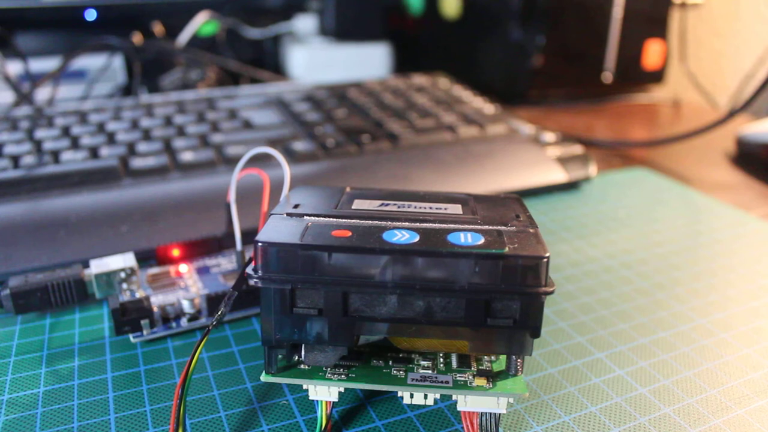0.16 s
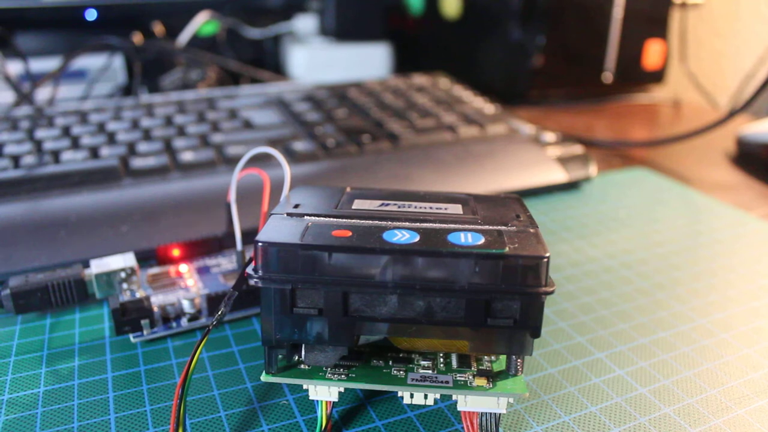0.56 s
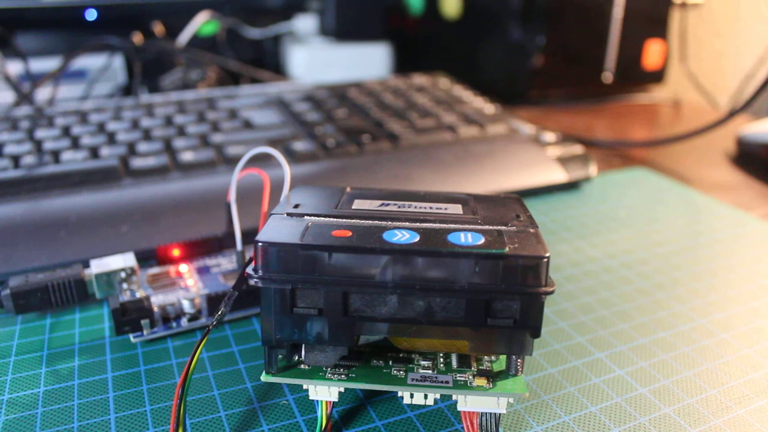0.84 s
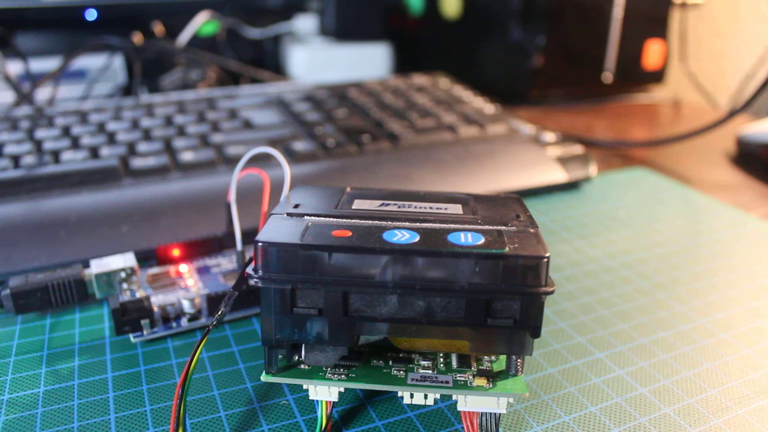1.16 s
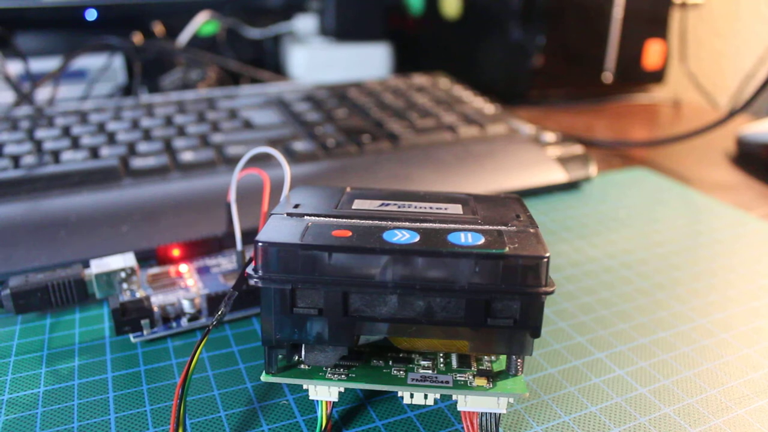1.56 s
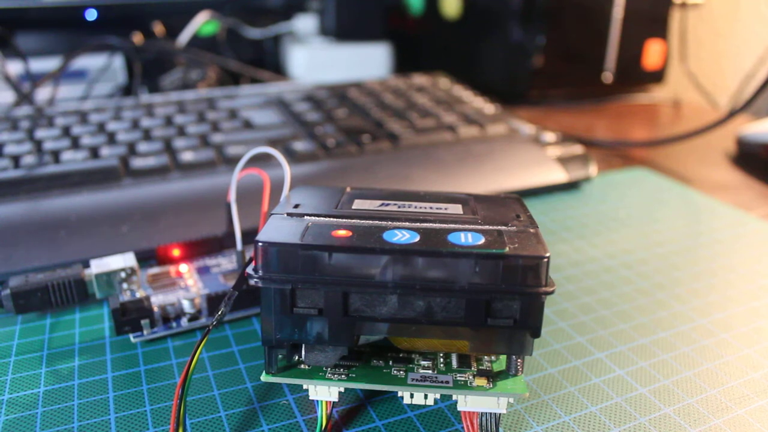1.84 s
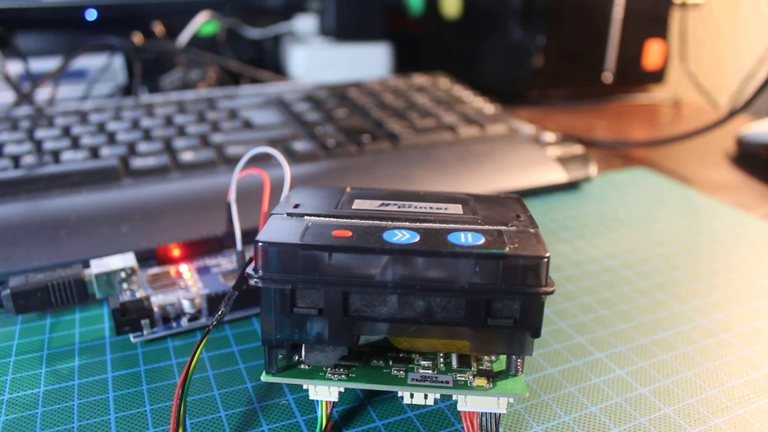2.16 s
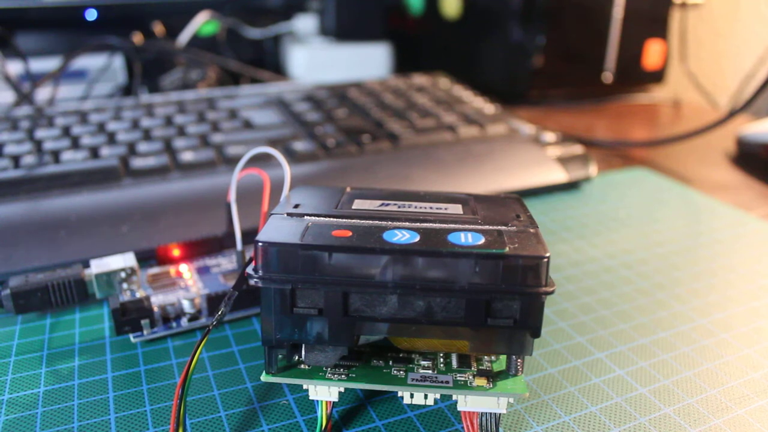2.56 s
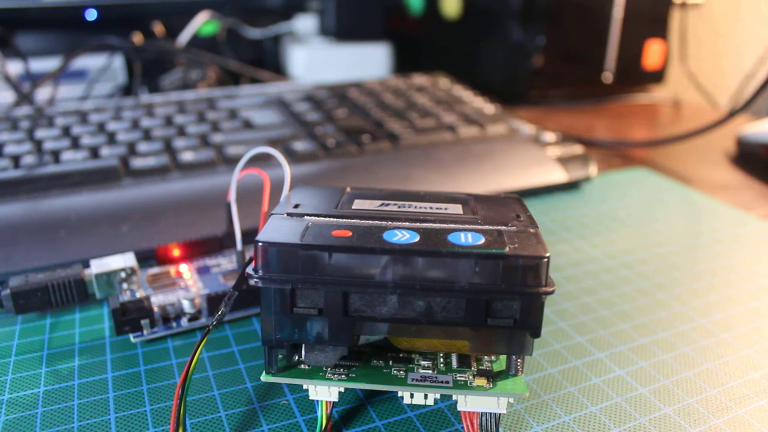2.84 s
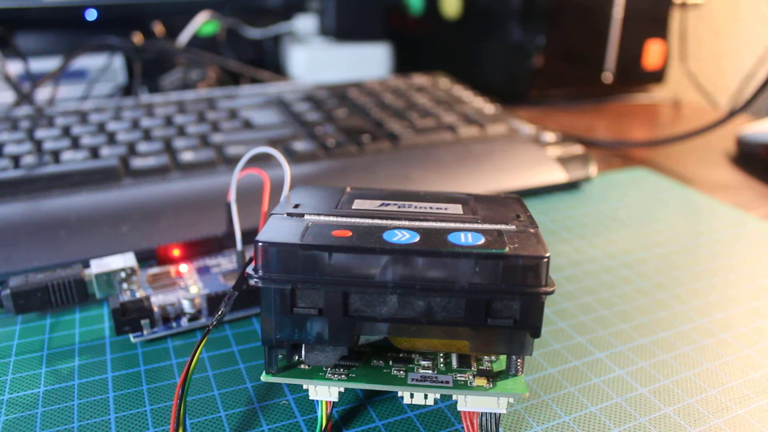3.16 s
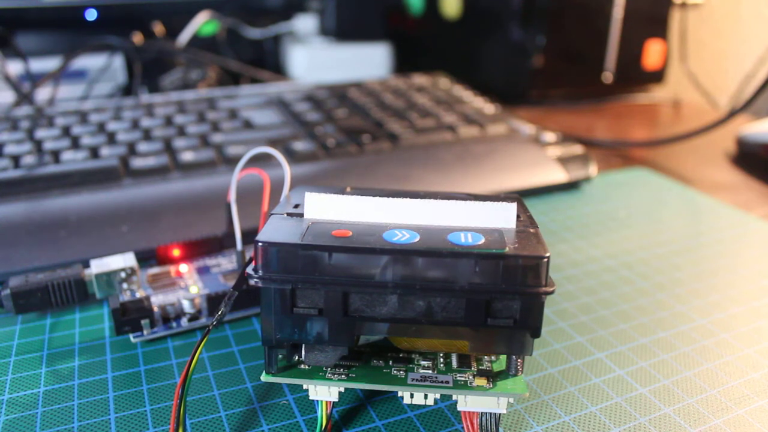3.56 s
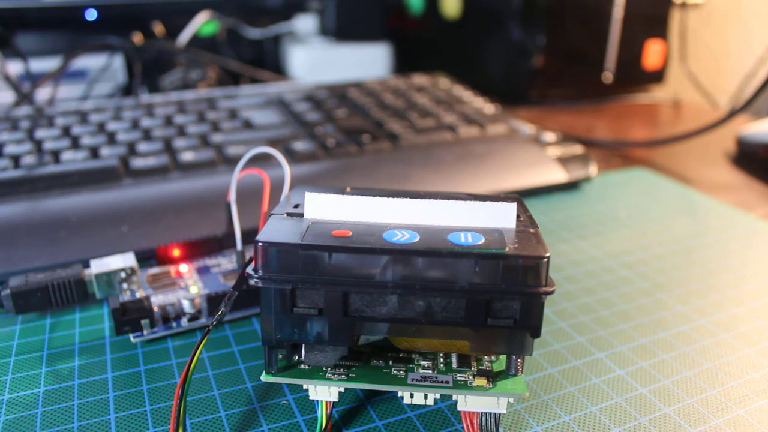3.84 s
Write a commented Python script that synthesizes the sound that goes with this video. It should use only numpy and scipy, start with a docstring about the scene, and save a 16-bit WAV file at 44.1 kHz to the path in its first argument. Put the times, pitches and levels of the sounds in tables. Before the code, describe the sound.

A small thermal printer buzzes briefly as it feeds paper, over soft computer fan noise.

```python
"""Thermal printer on a desk

Close on a small printer in a quiet room: computer fans, mains hum, a thin electronic whine and two
faint swishes. Late on it feeds a strip of paper. The gears clack as they take up slack, the stepper
motor whirs lightly, then labours in three buzzing surges, each step shaking case, gears and desk."""
import sys
import numpy as np
from scipy import signal
from scipy.io import wavfile
from scipy.ndimage import uniform_filter1d

SR = 44100
rng = np.random.default_rng(int(sys.argv[2]) if len(sys.argv) > 2 else 0)


def unload_wav(signal):
    """Save mono or channel-first audio to the path in sys.argv[1] as 16-bit WAV at rate SR, clipped to [-1, 1]."""
    wavfile.write(
        sys.argv[1],
        SR,
        np.round(np.clip(np.atleast_2d(signal).T, -1, 1) * 32767).astype(np.int16),
    )


N = 176400
T = np.arange(N) / SR


def amp(db):
    """Decibels to amplitude."""
    return 10 ** (np.asarray(db) / 20)


def unit_rms(x):
    """Scale to an RMS of 1."""
    return x / np.sqrt(np.mean(x ** 2) + 1e-20)


def curve_at(points, hz):
    """Read (frequency, value) points along a log frequency axis."""
    f, value = np.transpose(points)
    return np.interp(np.log(hz + 1), np.log(f + 1), value)


def resonate(x, hz, width_hz):
    """Two resonators in series, each width_hz wide, with gain 1 at a pitch that may move."""
    turn = np.exp(2j * np.pi * np.cumsum(hz * np.ones(len(x))) / SR)
    pole = np.exp(-np.pi * width_hz / SR)
    for _ in range(2):
        x = 2 * (turn * signal.lfilter([1 - pole], [1, -pole], x / turn + 1e-18)).real
    return x


def body(x, modes):
    """Ring modes (f/Hz, width/Hz, gain/dB) with alternating sign."""
    widen = 1.53  # offsets the narrowing of two resonators in series
    return sum((-1) ** k * amp(db) * resonate(x, f, w * widen) for k, (f, w, db) in enumerate(modes))


def noise_band(hz, width_hz, db):
    """A fuzzy tone: steady noise through one resonance."""
    return amp(db) * unit_rms(body(rng.standard_normal(N), [(hz, width_hz, 0)]))


def soften(x, cutoff_hz=10400):
    """Plastic teeth give little top treble."""
    return signal.lfilter(*signal.butter(3, cutoff_hz, fs=SR), x)


def fans(wash_db=-51.5):
    """Computer fans fill the room with broad noise, faintly drifting in patches, and fuzzy drones."""
    # fan noise spectrum: f/Hz, relative density/dB
    spectrum = [(12, -49), (20, -24), (47, -13), (70, -14), (87, -13.5), (106, -15.5), (122, -5), (161, -8),
                (245, -6.5), (383, -11.5), (506, -13), (1460, -18.5), (3360, -24), (9950, -33.5),
                (10800, -38), (11800, -37), (15500, -50)]
    # fan drones: f/Hz, width/Hz, level/dB
    drones = [(51.4, 8, -71.5), (192.7, 15, -61), (242, 31.7, -54), (294, 29, -63.5), (496.4, 57, -65),
              (3314, 70, -73)]
    frames, hz = N // 512 + 5, np.fft.rfftfreq(2048, 1 / SR)
    real, imag, patches = rng.standard_normal((frames, len(hz), 3)).T
    patches = uniform_filter1d(patches, size=20, axis=0)
    drift_db = 0.57 * unit_rms(uniform_filter1d(patches, size=8, axis=1))
    bins = (real + 1j * imag) * amp(curve_at(spectrum, hz)[:, None] + drift_db)
    wash = signal.istft(bins, nperseg=2048, noverlap=1536)[1][:N]
    return amp(wash_db) * unit_rms(wash) + sum(noise_band(*drone) for drone in drones)


def electronics(whine_hz=11719.5, waver_db=1.25):
    """Mains hum and thin high tones waver in level beside a whine whose throb slows a little."""
    # mains hum, then the high tones: f/Hz
    tones_hz = [100, 9922, 11592, 11647, 11680, 11900, 12882]
    # the same tones: level/dB
    tones_db = [-59.5, -87, -88, -86, -84, -89, -84]
    # throb rate of the whine: t/s, f/Hz
    throb_rate = [(0, 28.46), (.9, 28.3), (2.0, 27.06), (2.9, 25.8), (4, 26.3)]
    # lines of the whine: offset/multiples of the throb rate, level/dB
    sidebands = [(-11, -85), (-7, -86), (-4, -89), (-2, -79), (0, -84), (2, -82.5), (4, -84), (6, -82),
                 (8, -88), (11, -91)]
    tones = sum(amp(db) * np.sin(2 * np.pi * (f * T + rng.random()))
                for f, db in zip(tones_hz, tones_db))
    throb = np.cumsum(np.interp(T, *np.transpose(throb_rate))) / SR
    whine = sum(amp(db) * np.sin(2 * np.pi * (whine_hz * T + k * throb)) for k, db in sidebands)
    pulsing_noise = rng.standard_normal(N) * (1 + .6 * np.cos(4 * np.pi * throb))
    fuzz = amp(-81.5) * unit_rms(body(pulsing_noise, [(11720, 280, 0)]))
    drift = uniform_filter1d(uniform_filter1d(rng.standard_normal(N), size=4000), size=4000)
    waver = amp(waver_db * unit_rms(drift))
    return np.sqrt(2) * (tones * waver + whine) + fuzz + noise_band(9932, width_hz=35, db=-79.5)


def swishes():
    """Two faint brushes of noise swell and fade, the first falling in colour."""
    # brushes: centre t/s, half length/s, level/dB, from f/Hz, to f/Hz, resonator width/Hz
    brushes = [(0.231, .018, -54, 4200, 3230, 1610), (3.08, .05, -72, 10400, 10400, 1500)]
    out = np.zeros(N)
    for centre, half_length, db, from_hz, to_hz, width_hz in brushes:
        progress = (T - centre) / half_length
        hz = to_hz + (from_hz - to_hz) * (1 - np.tanh(progress)) / 2
        noise = unit_rms(resonate(rng.standard_normal(N), hz, width_hz))
        out += amp(db) * noise * np.exp(-progress ** 2 / 2)
    return out


def gear_clacks():
    """Teeth take up slack, and each short bright burst rings in the gear train."""
    # tooth impacts: t/s, peak level/dB, decay/s, sheen gain/dB
    impacts = [(3.2094, -15.5, 0.0011, 6), (3.2115, -16, 0.0018, 5), (3.279, -33, .002, -4),
               (3.284, -31, 0.0016, 0), (3.301, -28, .002, -6), (3.304, -17, 0.0015, -4),
               (3.4173, -29, .002, -8), (3.424, -18, .002, -9), (3.448, -17, 0.0013, -8)]
    # ring of the gear train: f/Hz, width/Hz, gain/dB
    ring = [(1100, 300, -7), (1910, 500, -10), (4100, 1100, -11), (5070, 800, 0), (6700, 1160, -3),
            (7500, 1000, -2.5), (9080, 870, -3)]
    # top treble sheen: f/Hz, width/Hz, gain/dB
    sheen = [(11500, 1200, -22.5), (13600, 1200, -28)]
    out, t = np.zeros(N), np.arange(1500) / SR
    for start, db, decay, sheen_db in impacts:
        burst = rng.standard_normal(len(t)) * np.exp(-t / decay)
        hit = body(soften(burst), ring) + amp(sheen_db) * body(burst, sheen)
        out[round(start * SR):][:len(t)] += amp(db) * hit / abs(hit).max()
    return out


def rotor_whirr():
    """The rotor's fuzzy tone sags under load."""
    # course of the whirr: t/s, f/Hz, level/dB
    course = [(3.213, 1070, -38), (3.23, 1080, -43), (3.255, 1100, -47), (3.275, 1030, -42),
              (3.31, 967, -41), (3.334, 926, -38), (3.35, 940, -60)]
    times, hz, db = np.transpose(course)
    whirr = resonate(rng.standard_normal(N), np.interp(T, times, hz), width_hz=40)
    return amp(np.interp(T, times, db, left=-200, right=-200)) * unit_rms(whirr)


def paper_feed(rate_wobble=.02, step_spread_db=3, rattle_decay_steps=0.72, ticks_per_s=9000):
    """Each motor step knocks the case, rattles the gears and thrums the desk while the strip rasps."""
    # motor run: t/s, step rate/Hz, level/dB of knock, rattle, treble, thrum and boom, roughness/0-1
    feed = [(3.214, 316.7, -27, -31.5, -44, -58, -55, 0.35), (3.222, 321.2, -36, -38.5, -44, -46, -58, 0.3),
            (3.25, 325.1, -37, -41, -40, -60.5, -47, 0.42), (3.266, 339.1, -36, -45, -48, -58, -48, 0.4),
            (3.27, 326.9, -40, -49, -52, -51, -46, 0.35), (3.28, 240.7, -35, -37, -38, -53, -36, 0.28),
            (3.29, 238.3, -25.5, -37, -36.5, -53, -36.5, 0.42),
            (3.302, 238.2, -22.5, -32, -30, -40.5, -38, 0.34), (3.318, 238, -38, -44, -49, -59, -41, 0.17),
            (3.332, 236.3, -50, -44, -45, -46, -59, 0.34),
            (3.35, 258.5, -30, -38, -39.5, -40.5, -35.5, 0.3),
            (3.366, 260.5, -24, -37.5, -41, -38, -37.5, 0.29), (3.39, 261.8, -43, -50, -52, -60, -47, 0.42),
            (3.402, 250.2, -38.5, -40.5, -47, -40, -41.5, 0.36),
            (3.418, 243.6, -24, -36, -34, -42.5, -32.5, 0.42),
            (3.428, 245.2, -23, -34, -29.5, -55, -37, 0.35),
            (3.438, 260.1, -28, -30.5, -32, -41, -34.5, 0.23),
            (3.452, 263, -27.5, -36, -38, -37, -42.5, 0.42), (3.48, 270, -55, -51, -65, -48, -51, 0.4)]
    # case resonances (knock): f/Hz, width/Hz, gain/dB
    case = [(1003, 120, 1.5), (1224, 245, 6), (1620, 130, -14), (2030, 204, 3), (2300, 230, -10.5),
            (2720, 310, -8.5)]
    # gear resonances (rattle): f/Hz, width/Hz, gain/dB
    gears = [(3100, 580, -7), (3670, 190, -1), (4160, 360, 0.5), (4930, 310, 0), (5820, 750, -6.5)]
    # pinion resonances (treble): f/Hz, width/Hz, gain/dB
    pinion = [(6800, 540, 1.5), (7900, 700, -1.5), (8880, 560, 2), (9480, 480, 0.5), (10300, 1300, -14),
              (12000, 1300, -19), (13800, 1000, -17)]
    # desk resonances (thrum): f/Hz, width/Hz, gain/dB
    desk = [(162, 77, -2), (255, 84, 0)]
    # loaded case panels (boom): f/Hz, width/Hz, gain/dB
    panels = [(532, 150, -6.5), (780, 197, 1)]
    # rasp of the paper strip: f/Hz, width/Hz, gain/dB
    paper = [(7000, 3000, -2), (10900, 1500, 0), (13500, 1400, -15)]
    # clean fourth partial of the unloaded motor: t/s, level/dB
    partial = [(3.225, -60), (3.24, -40), (3.265, -46), (3.278, -60)]
    times, *columns = np.transpose(feed)
    t = np.arange(times[0], times[-1] + 0.037, 1 / SR)
    n = len(t)
    step_hz, *levels_db, roughness = (np.interp(t, times, column) for column in columns)

    wobble = rate_wobble * unit_rms(uniform_filter1d(rng.standard_normal(n), size=150))
    steps = np.cumsum(step_hz * (1 + wobble)) / SR
    step_index = steps.astype(int)
    strength = amp(step_spread_db * rng.standard_normal(200))[step_index]
    kicks = (1 - roughness) * unit_rms(np.diff(step_index, prepend=0) * strength)
    shake = 0.7 + strength * np.exp(-(steps % 1) / rattle_decay_steps)  # steady bed, a puff each step
    grit = roughness * unit_rms(shake * rng.standard_normal(n))

    grind = amp(-6.5) * unit_rms(body(kicks + grit, [(1570, 900, 0)]))
    knock = unit_rms(body(kicks + grit, case)) + grind
    ticks = rng.random(n) < ticks_per_s / SR
    tick_db = 4 * np.minimum(rng.exponential(1, n), 2.5)
    chatter = soften(shake * ticks * amp(tick_db) * rng.choice([-1, 1], n))
    rattle, treble = body(chatter, gears), body(chatter, pinion)
    push = kicks + 0.87 * grit  # the low resonances get less grit
    thrum, boom = body(push, desk), body(push, panels)
    layers = knock, rattle, treble, thrum, boom
    buzz = sum(amp(db) * unit_rms(layer) for db, layer in zip(levels_db, layers))

    tone_db = np.interp(t, *np.transpose(partial), left=-200, right=-200)
    tone = amp(tone_db) * np.sin(2 * np.pi * 4 * steps)
    rasp = amp(-57) * unit_rms(body(rng.standard_normal(n), paper))
    attack = np.clip((t - times[0]) / 0.0013, 0, 1)
    release = np.exp(-np.maximum(t - times[-1], 0) / 0.0053)
    out = np.zeros(N)
    out[round(times[0] * SR):][:n] = attack * release * (buzz + tone + rasp)
    return out


def room(x):
    """Sparse reflections come back to the microphone, each band dying at its own speed."""
    # reverberation time: f/Hz, T60/s
    t60 = [(250, .1), (1000, 0.21), (4500, 0.25), (7000, .24), (9500, 0.14), (13000, 0.13)]
    taps = np.zeros(SR // 2)
    slots = np.arange(150, SR // 2 - 20, 20)
    taps[slots + rng.integers(0, 20, len(slots))] = rng.choice([-1., 1.], len(slots))
    hz, t, bins = signal.stft(taps, SR, nperseg=256)
    decay = amp(-60 * t / curve_at(t60, hz)[:, None])
    tail = signal.istft(bins * decay, SR, nperseg=256)[1]
    return signal.fftconvolve(x, tail / np.linalg.norm(tail))[:N]


def scene():
    """The printer close by in mono, its reflections and the room tone behind it."""
    printer = paper_feed() + gear_clacks() + rotor_whirr()
    return (printer + amp(-10.5) * room(printer) + fans() + electronics() + swishes())[None]


def record(dry, open_s=.0722, cutoff_hz=15650):
    """The microphone opens a moment in; its top treble is cut steeply."""
    fade_in = np.clip((T - open_s) / .0005, 0, 1)
    lowpass = signal.firwin(1023, cutoff_hz, window=("kaiser", 10), fs=SR)[None]
    return signal.oaconvolve(dry * fade_in, lowpass, "same")


dry = scene()
out = record(dry)
unload_wav(out)
```